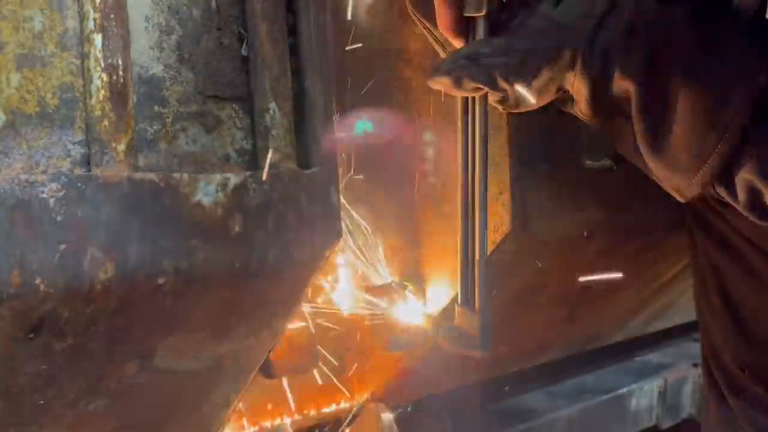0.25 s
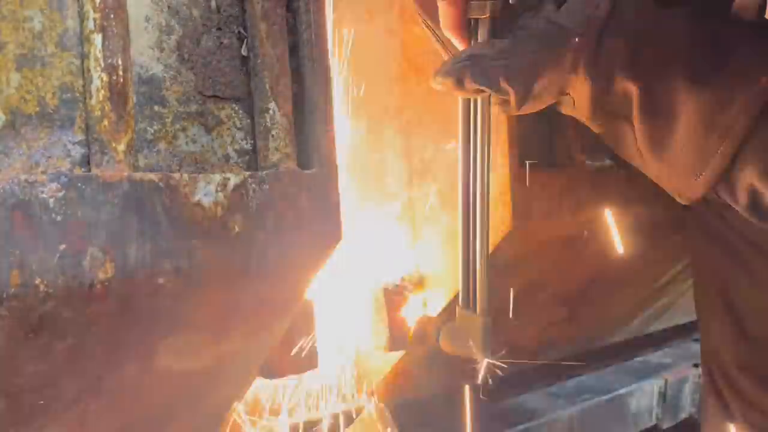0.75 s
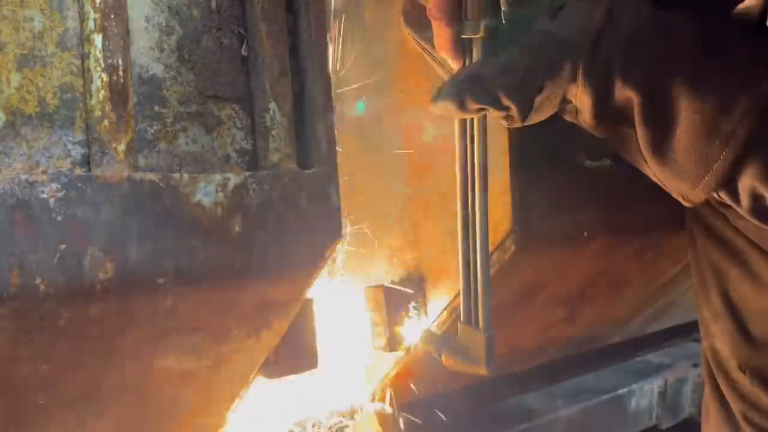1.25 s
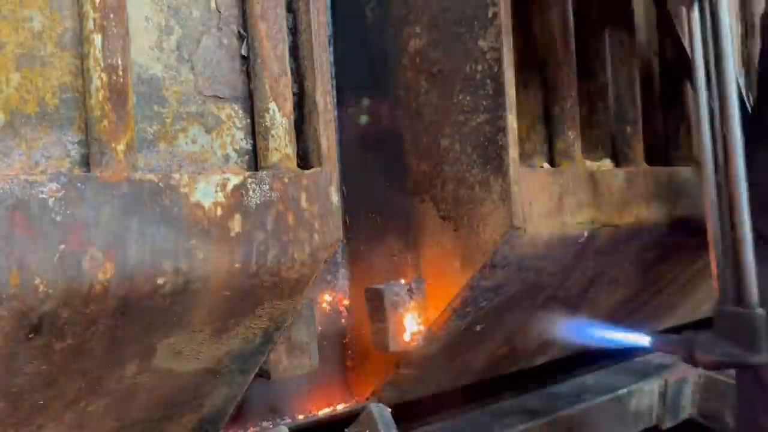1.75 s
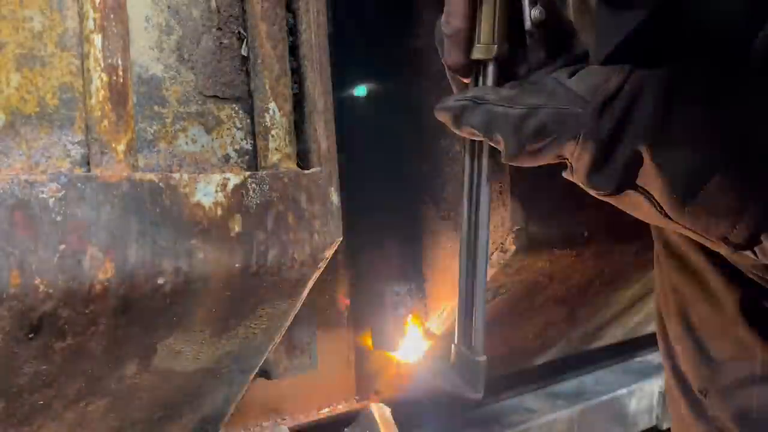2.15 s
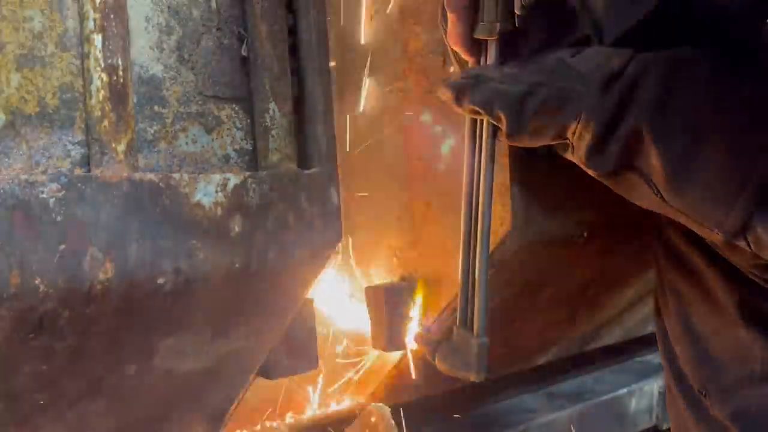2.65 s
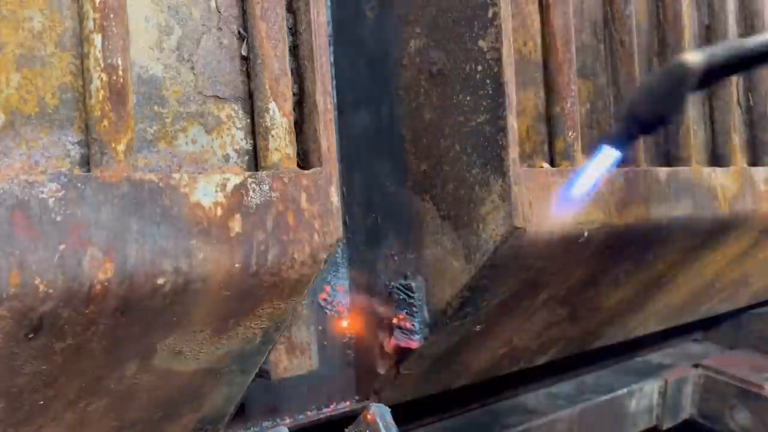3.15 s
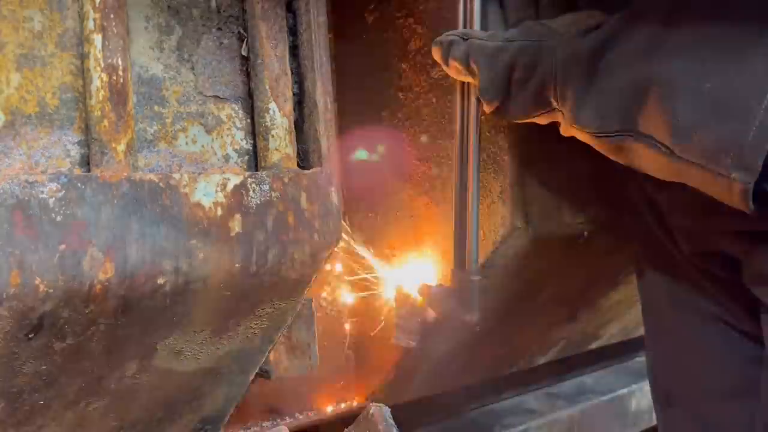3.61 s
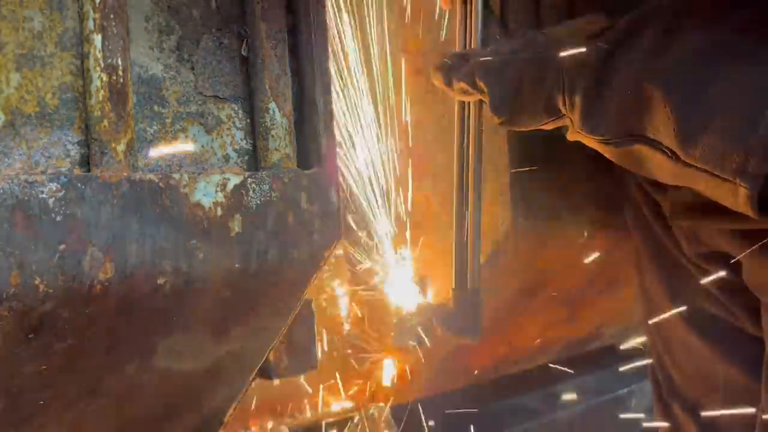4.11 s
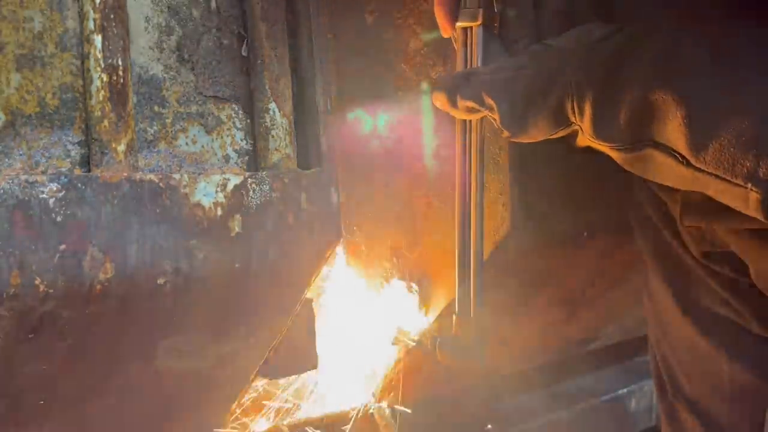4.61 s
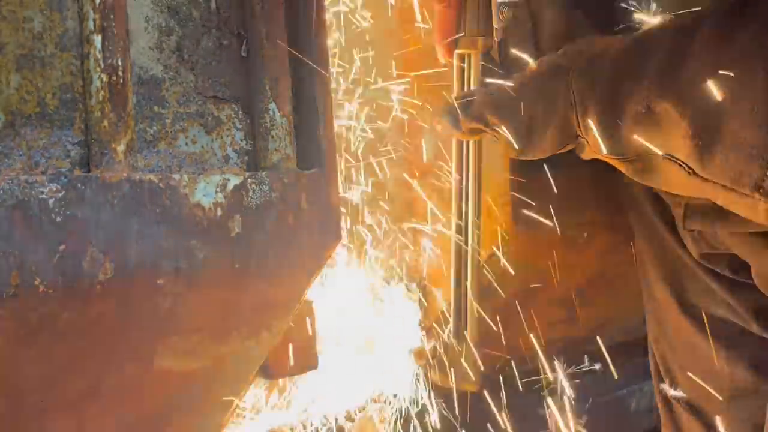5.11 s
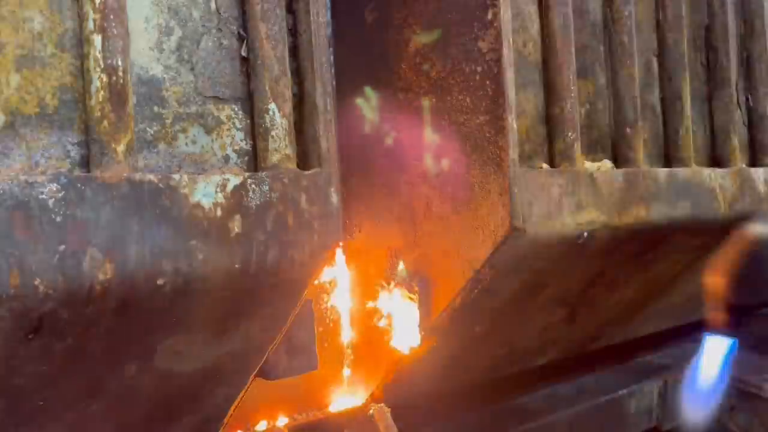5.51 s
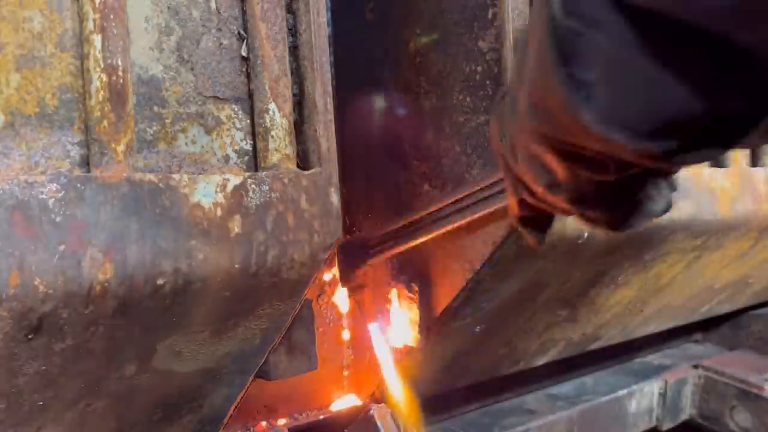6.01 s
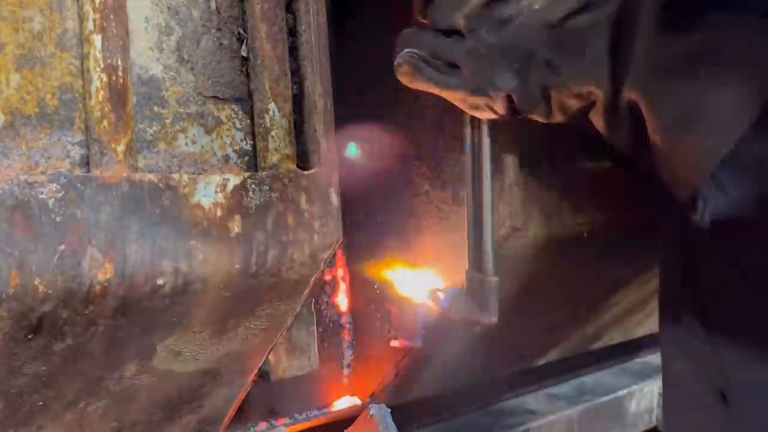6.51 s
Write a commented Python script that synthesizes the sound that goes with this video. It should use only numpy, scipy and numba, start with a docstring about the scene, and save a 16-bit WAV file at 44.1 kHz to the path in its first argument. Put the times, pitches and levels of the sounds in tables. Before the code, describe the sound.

Steady gas jet noise in a workshop, heard close and fairly dry: airy treble hiss, resonant roar and fluttering bass. Slag spits in short soft bursts, and loud backfires crack with a brief steely ring early and past the middle. A thin unsteady whistle comes and goes as cutting starts. Three times the flame moves clear and the hiss turns wider and phasey, longest near the end, with tiny crisp ticks.

```python
"""Gas torch cutting steel in a narrow gap

A torch works close by between rusty steel parts. Filtered noise makes its bass sputter, its roar between
the plates and the hiss of its jet; a jittering tone whistles, slag spits as short noise swells,
and backfires are falling chirps that ring two steel modes. When the torch swings clear of the gap, an echo
combs the hiss, its bright band sweeps, and roar and hiss widen."""
import sys
import numpy as np
from scipy import signal
from scipy.fft import rfft, irfft, next_fast_len
from scipy.io import wavfile
from scipy.ndimage import uniform_filter1d, map_coordinates
from numba import njit

SR = 44100
rng = np.random.default_rng(int(sys.argv[2]) if len(sys.argv) > 2 else 0)


def store_wav(level_fs):
    """Save 16-bit WAV to argv[1]."""
    pcm = np.round(np.clip(np.atleast_2d(level_fs), -1, 1) * 32767)
    wavfile.write(sys.argv[1], SR, pcm.T.astype(np.int16))


def gain_from_db(level_db):
    """Turn a decibel level (scalar or array-like) into a linear amplitude factor."""
    decades = np.asarray(level_db, float) / 20
    return 10 ** decades


N = 298113
HZ = np.fft.rfftfreq(next_fast_len(N), 1 / SR)
T = np.arange(N) / SR
LOW_CUT = signal.butter(4, 420, "highpass", fs=SR, output="sos")
GAP_CM, GAP_LIFT_DB = 5.7, 7.5  # echo path and lift of the bright band inside the gap


def shape(table, hz):
    """Spectral shaping: gain interpolated in dB along a log-frequency axis."""
    f, db = np.transpose(table)
    return gain_from_db(np.interp(np.log(hz + 1), np.log(f), db))


def unit(x):
    """Power normalization: scale to rms 1."""
    return x / np.sqrt(np.mean(x ** 2))


def walk(rate):
    """Slow random modulation: levels drawn every 1 / rate s, joined by slopes; spread near 1."""
    k = int(SR / rate)
    held = np.repeat(rng.standard_normal(N // k + 1), k)
    return uniform_filter1d(held, k)[:N]


@njit
def svf(x, hz, width):
    """Resonance: a state-variable band-pass with a moving centre, gain 1 at the centre."""
    y, b, l = np.empty(len(x)), 0., 0.
    for i in range(len(x)):
        g, k = np.tan(np.pi * hz[i] / SR), width[i] / hz[i]
        v = (b + g * (x[i] - l)) / (1 + g * (g + k))
        b, l, y[i] = 2 * v - b, l + 2 * g * v, k * v
    return y


def joined(tables, rest):
    """Piecewise-linear control: columns of several spans over the whole time, at rest between them."""
    out = np.outer(rest, np.ones(N))
    for table in tables:
        s, *columns = np.transpose(table)
        on = (T >= s[0]) & (T < s[-1])
        out[:, on] = [np.interp(T[on], s, c) for c in columns]
    return out


# The torch swung clear of the gap, one list of rows per swing. Each row: time in seconds,
# extra path of the echo in cm, lift of the bright band in dB.
SWINGS = [
    [(1.66, 5.7, 4), (1.7, 7, 4), (1.8, 7.6, 4), (1.86, 7, 7), (1.92, 5.7, 6)],
    [(2.78, 6.5, 2), (2.82, 9.3, 1), (2.9, 10, 1), (3.0, 9, 1), (3.04, 10, 9), (3.15, 9.8, 10),
     (3.21, 8.6, 9), (3.3, 5.7, 6)],
    [(5.38, 6.2, 2), (5.43, 8.6, 0), (5.54, 11, 0), (5.6, 9.2, 0), (5.66, 7, 2), (5.75, 7.6, -2),
     (6.0, 7.7, -2), (6.15, 7.4, -3), (6.3, 7.7, -3), (6.35, 7.4, 3), (6.41, 7.2, 6), (6.49, 5.7, 6)],
]


def swing():
    """Source motion: echo path (cm), being clear of the gap (0-1) and the bright band's lift (dB)."""
    path_cm, lift_db = joined(SWINGS, rest=(GAP_CM, GAP_LIFT_DB))
    clear = uniform_filter1d(1. * (path_cm > GAP_CM), size=int(.05 * SR))  # eased over 50 ms
    return path_cm, clear, lift_db


# Course of the flame. Each row: time in seconds, then levels in dB before each layer's own trim:
# roar between the plates, free jet hiss, slag sputter.
TORCH_LEVELS = [(0.0, -36.5, -33.5, -42), (0.09, -36.5, -36.5, -45.5), (0.21, -39.5, -37.5, -52),
                (0.3, -43, -40, -55), (0.6, -42.5, -40, -54.5), (0.92, -39.5, -38, -50.5),
                (1.56, -41, -38.5, -51.5), (1.9, -39, -35.5, -52.5), (2.18, -37, -33.5, -52),
                (2.39, -38, -35, -48), (2.54, -38.5, -37.5, -49.5), (2.82, -41.5, -37.5, -56),
                (3.09, -43.5, -38, -56), (3.24, -36.5, -35.5, -52), (3.41, -35, -34.5, -52.5),
                (3.54, -35, -33.5, -53.5), (3.75, -37, -33.5, -54), (4.05, -39, -37, -48.5),
                (4.39, -39.5, -38.5, -53), (4.86, -40.5, -37.5, -51), (4.95, -38, -35, -48.5),
                (5.14, -36.5, -33.5, -50), (5.48, -40.5, -35, -55.5), (5.74, -40, -34.5, -54),
                (5.99, -35.5, -32, -50), (6.29, -38.5, -31.5, -52.5), (6.44, -37, -35.5, -51),
                (6.76, -34.5, -33.5, -53)]


def torch_levels():
    """Level interpolation: roar, hiss and sputter (dB) follow the torch's course in straight lines."""
    s, *columns = np.transpose(TORCH_LEVELS)
    return [np.interp(T, s, c) for c in columns]


# The flame falters (-) or flares (+). Each row: centre in seconds, change in dB at the centre,
# half length to 1/e of the change in seconds.
FLAME_FLUTTERS = [(0.11, 4.5, .01), (0.136, -0.5, .015), (0.184, 5, 0.017), (0.213, 0, 0.0087),
                  (0.497, 3, 0.0093), (0.764, 4, 0.038), (1.119, 3.5, 0.011), (1.66, -3.5, 0.01),
                  (1.912, -9, .01), (1.962, -7, 0.013), (2.006, 6.5, 0.043), (2.079, -2.5, 0.018),
                  (2.228, 3.5, 0.018), (2.59, -0.5, 0.022), (2.672, -4.5, .015), (2.741, 5, 0.0081),
                  (2.792, -3.5, 0.0075), (3.323, -5, 0.011), (3.447, -5, 0.022), (3.543, -3, 0.023),
                  (3.657, 3, 0.083), (3.917, -3, 0.073), (4.206, 3, 0.0049), (4.725, 3, 0.012),
                  (4.803, -1, 0.027), (5.104, -1.5, 0.016), (4.624, -8, 0.0072), (4.992, 2.5, 0.032),
                  (5.367, -12, 0.006), (5.395, 1.5, .015), (5.85, 2, .012), (6.1, -2, 0.0098),
                  (6.23, 0.5, .06), (6.44, 4, 0.04), (6.495, -3.5, 0.026), (6.59, 4, 0.013)]


def flutter():
    """Amplitude modulation: Gaussian dips and flares of the flame, summed in dB."""
    flutter_db = np.zeros(N)
    for at, db, half in FLAME_FLUTTERS:
        near = slice(max(int((at - 2 * half) * SR), 0), int((at + 2 * half) * SR))
        flutter_db[near] += db * np.exp(-((T[near] - at) / half) ** 2)
    return flutter_db


# Preheating, the cutting oxygen shut. Each row: start in seconds, end in seconds;
# a row that ends before it starts has no effect.
PREHEAT_SPANS = [(.32, 0.75), (1.92, 2.25), (3.3, 3.2), (6.49, 6.2)]


def preheating():
    """Gating: 1 while preheating, else 0, with smoothed edges."""
    gate = sum(1. * (T > on) * (T < off) for on, off in PREHEAT_SPANS)
    return uniform_filter1d(gate, size=400)


# Stereo width of the noise inside the gap. Each row: frequency in Hz, side minus mid in dB.
STEREO_WIDTH = [(60, -5), (110, -6), (200, -26), (380, -22), (700, -24), (1290, -27), (2380, -18.5),
                (4400, -10.5), (8120, -12), (15000, -7)]


def turbulence(table, edges_hz, shared_db, own_db, rate):
    """Turbulent noise: partly coherent left and right, in bands that flicker together and alone."""
    path_cm = swing()[0]
    widen = gain_from_db(path_cm - GAP_CM)  # 1 dB per cm beyond the gap's path
    mid, side = rfft(rng.standard_normal((2, 2 * len(HZ) - 2))) * shape(table, HZ)
    side = side * shape(STEREO_WIDTH, HZ)
    shared, bands = shared_db * walk(rate), []
    for lo, hi in zip(edges_hz, edges_hz[1:]):
        in_band = (HZ >= lo) & (HZ < hi)
        m, s = irfft(np.array([mid, side]) * in_band)[:, :N]
        s = s * widen if lo > 1200 else s
        bands.append(np.array([m + s, m - s]) * gain_from_db(shared + own_db * walk(rate)))
    return bands


# Colour of the sputter. Each row: frequency in Hz, relative density in dB per Hz.
SPUTTER_COLOUR = [(35, -76), (60, -55), (114, -44.5), (224, -36), (394, -11), (637, -1), (1150, -1),
                  (1470, -3), (1600, -14), (2080, -12), (3520, -120)]


def sputter():
    """Modulated low-frequency noise: slag flutters in the bass of the flame."""
    sputter_db = torch_levels()[2]
    noise = sum(turbulence(SPUTTER_COLOUR, (20, 600, 1000, 1700), shared_db=3.0, own_db=-1.0, rate=60))
    return unit(noise) * gain_from_db(sputter_db + 3.5 + .37 * flutter())  # share of the flutter


# Slag blown out, low bursts first, then spits in the treble. Each row: start in seconds,
# level in dB before the 9.5 dB trim, centre in Hz, length in seconds.
SLAG_BURSTS = [(0.091, -24.5, 615, 0.021), (0.192, -17, 2100, 0.008), (0.825, -21, 2340, 0.0089),
               (0.868, -25.5, 1360, 0.01), (0.959, -33, 1500, 0.013), (0.989, -26.5, 3880, 0.014),
               (1.052, -28, 1430, 0.011), (1.096, -24.5, 646, 0.03), (1.156, -23.5, 1400, 0.014),
               (1.328, -21.5, 1520, 0.0081), (1.412, -30, 1500, 0.0093), (1.688, -28, 3870, 0.018),
               (2.284, -21, 2550, 0.015), (2.368, -18, 920, 0.015), (2.43, -24.5, 2510, 0.014),
               (2.503, -23.5, 720, 0.015), (2.631, -16, 2390, 0.0053), (2.723, -26.5, 2240, 0.051),
               (3.306, -24.5, 2180, 0.011), (4.047, -6.5, 2477, 0.0053), (4.208, -17.5, 2220, 0.0056),
               (4.743, -21.5, 2230, 0.0097), (4.852, -31, 2000, 0.01), (4.932, -24, 3620, 0.015),
               (4.993, -21, 580, 0.0081), (5.099, -22.5, 1820, 0.011), (5.275, -20.5, 1830, 0.032),
               (6.569, -22.5, 2260, 0.015), (1.617, -21, 13700, 0.011), (2.735, -27, 13300, 0.0053),
               (2.767, -42, 13170, 0.02), (3.3594, -18, 6370, 0.0079), (5.864, -25, 14100, 0.01),
               (5.926, -19.5, 6410, 0.01), (5.98, -15, 12300, 0.01), (6.0374, -9, 13300, 0.0056),
               (6.2554, -11, 12900, 0.0069)]


def slag():
    """Transient band noise: each burst swells quickly and dies as a Gaussian; no bass."""
    out, size, spread = np.zeros(N + SR), 4096, .61  # spread: bandwidth over centre
    for s, db, hz, length in SLAG_BURSTS:
        t = np.arange(size) / SR / length
        noise = rng.standard_normal(size)
        body = unit(svf(noise, np.full(size, 1. * hz), np.full(size, spread * hz)))
        start = int(s * SR)
        out[start:start + size] += gain_from_db(db - 9.5) * body * np.minimum(3 * t, 1) * np.exp(-t ** 2)
    return signal.sosfilt(LOW_CUT, out[:N])


# Backfires. Each row: time in seconds, chirp peak in dB before the stereo blend, ring over chirp in dB,
# treble tilt in dB per octave (reached well above 2 kHz), polarity of the chirp, +1 or -1.
BACKFIRES = [(.23161, -6, -12, 3, 1), (.23253, -6.5, 2, 1, 1), (.23599, -5, -12, 0, 1),
             (3.95326, -5.5, 2, 0, 1), (4.01615, -7, -3, 0, 1), (4.64016, -6, -1, 2, -1),
             (4.64195, -3.5, -12, 0, 1), (4.64374, -6, -12, 0, -1)]
# Spectrum of a backfire. Each row: frequency in Hz, relative density in dB per Hz.
BACKFIRE_COLOUR = [(30, -16), (170, -17), (300, -14), (450, 1), (650, .5), (1000, 2.5), (1500, -.5),
                   (2500, -11), (4000, -9.5), (6000, -18.5), (8000, -19.5), (13000, -44.5)]
# Modes of the steel. Each row: frequency in Hz, relative level in dB, 60 dB decay time in seconds.
STEEL_MODES = [(430, -16, .1), (501, -15.5, .11)]


def backfires():
    """Dispersion and modal ringing: treble arrives first, then two close steel modes beat."""
    size, lead = 8192, 64
    lag_s, bend, turn = .001343, .7477, .027  # delay at 1 kHz, its power of frequency, phase in cycles
    hz, t = np.fft.rfftfreq(size, 1 / SR), np.arange(size) / SR
    # delay falls as a power of frequency; the phase is its integral
    cycles = lag_s * 1000 ** bend * hz ** (1 - bend) / (1 - bend) - turn + hz * lead / SR
    phase = -2 * np.pi * cycles
    ring = sum(gain_from_db(db - 60 * t / t60) * np.sin(2 * np.pi * f * t) for f, db, t60 in STEEL_MODES)
    ring = np.roll(ring * np.minimum(t / .003, 1), lead)
    out = np.zeros(N + size)
    for s, db, ring_db, treble_db, polarity in BACKFIRES:
        tilt = gain_from_db(treble_db * np.log2(1 + hz / 2000))
        at = s * SR - int(s * SR)  # fraction of a sample
        spectrum = shape(BACKFIRE_COLOUR, hz) * tilt
        chirp = irfft(spectrum * np.exp(1j * (phase - 2 * np.pi * hz * at / SR)))
        chirp = chirp * np.exp(-(t / .014) ** 2)
        chirp = polarity * chirp / np.abs(chirp).max()
        start = int(s * SR) - lead
        out[start:start + size] += gain_from_db(db) * (chirp + gain_from_db(ring_db) * ring)
    # the right channel blends in a copy half a millisecond late
    return np.array([out[:N], .86 * out[:N] + .14 * np.roll(out[:N], 22)])


# The whistle catches as the oxygen bites, then climbs, thins and fades. Each row: start in seconds,
# starting level in dB, length in seconds.
WHISTLE_CATCHES = [(0.486, -37.5, 0.038), (0.736, -38.5, .205), (2.204, -35, 0.074), (2.274, -37.5, 0.12),
                   (3.576, -34.5, 0.32), (6.722, -36.5, 0.46)]
# Steady whistling of the torch, near 1500 or 1900 Hz. Each row: start in seconds, length in seconds,
# starting pitch in Hz, level in dB after the swell, width in Hz.
WHISTLE_NOTES = [(0.451, .285, 1872, -48.5, 80), (0.939, 0.26, 1486, -49, 80), (1.24, .3, 1494, -47.5, 50),
                 (1.57, 0.097, 1467, -49, 40), (1.701, .5, 1900, -49, 90), (2.582, 0.21, 1479, -53, 55),
                 (3.201, .375, 1921, -41.5, 132.5), (6.4, 0.48, 1948, -43, 110)]


def whistling():
    """Frequency and amplitude contours: pitch, level, octave level and width of the whistle."""
    u = np.linspace(0, 1, num=9)
    catches = []
    for s, db, length in WHISTLE_CATCHES:
        hz = 1235 + 211.5 * u ** 2.5
        catches.append(np.transpose([s + length * u, hz, db - 13.5 * u ** 1.25, db - 22 * u, 167.8 - 60 * u]))
    notes = []
    for s, length, hz, db, width in WHISTLE_NOTES:
        # pitch creeps up 60 Hz per s, level swells by 1.5 dB in the first third
        notes.append([(s + t, hz + 60 * t, db - 1.5 * (t == 0), db - 24, width)
                      for t in (0, length / 3, length)])
    return joined(notes + catches, rest=(1500, -90, -90, 100))


def whistle():
    """Self-sustained oscillation: a tone whose pitch jitters within its width, with a rougher octave."""
    hz, first_db, octave_db, width = whistling()
    jittered_hz = hz + 18 * walk(15) + .75 * width * walk(600)  # slow waver, then fast jitter
    phase = 2 * np.pi * np.cumsum(jittered_hz) / SR
    first = np.sin(phase) * gain_from_db(3 * walk(60)) * uniform_filter1d(gain_from_db(first_db), size=300)
    rough = svf(rng.standard_normal(N), 2 * hz, 3.0 * width)
    rough = svf(rough, 2 * hz, 3.0 * width)
    octave = rough / np.sqrt(width / SR) * uniform_filter1d(gain_from_db(octave_db), size=300)
    return signal.sosfilt(LOW_CUT, np.sqrt(2) * first + .5 * octave)


# Colour of the roar. Each row: frequency in Hz, relative density in dB per Hz.
ROAR_COLOUR = [(880, -19), (1500, -14), (1580, -3), (1730, -3.5), (1940, -1.5), (2140, -1), (2310, 0),
               (3030, -5.5), (3460, -6.5), (3940, 0.5), (4160, 0), (4790, -5.5), (5300, -9.5), (6890, -38),
               (11700, -120)]
# Low, middle and top of the roar. Each row: trim in dB, change clear of the gap in dB,
# change while preheating in dB.
ROAR_TRIMS = [(0.5, -0.5, 0), (0.5, 4, 0.5), (0.5, -2, 0.5)]


def roar():
    """Resonant coloration: turbulent noise coloured by the plates, band by band."""
    roar_db = torch_levels()[0]
    clear, preheat = swing()[1], preheating()
    bands = turbulence(ROAR_COLOUR, (1400, 2970, 3920, 5220), shared_db=1.0, own_db=0.67, rate=70)
    bands = unit(np.array(bands))
    mix = sum(band * gain_from_db(db + clear_db * clear + preheat_db * preheat)
              for band, (db, clear_db, preheat_db) in zip(bands, ROAR_TRIMS))
    return mix * gain_from_db(roar_db - 4.5 + .54 * flutter())  # share of the flutter


def swept(x, tremble):
    """Comb filtering: an echo off the plate delays with the path; the jet's brightest band sweeps."""
    path_cm, clear, lift_db = swing()
    path_cm = path_cm + .35 * clear * tremble
    bright_hz = 13995 * (GAP_CM / path_cm) ** 1.8  # falls as the path grows
    # the rusty, uneven plate returns only part of it, in patches
    echo = .68 * clear * np.clip(.7 + .35 * walk(40), 0, 1)
    late = map_coordinates(x, [np.arange(N) - SR * path_cm / 34300], order=3)  # sound speed in cm/s
    x = (x + echo * late) / np.sqrt(1 + echo ** 2)
    return x + (gain_from_db(lift_db) - 1) * svf(x, bright_hz, .28 * bright_hz)


# Colour of the hiss. Each row: frequency in Hz, relative density in dB per Hz.
HISS_COLOUR = [(3060, -41), (5200, -11.5), (5480, -5), (5930, 0.5), (6640, -3.5), (7360, -1), (8090, -1),
               (8810, 0), (10200, -1), (11700, -1), (14800, -3.5), (15500, 3.5), (16000, -51)]
# Low, middle and top of the hiss. Each row: trim in dB, gain in dB per dB of hiss over roar,
# change clear of the gap in dB, change while preheating in dB.
HISS_TRIMS = [(-5, 0.01, 0, -1), (-9.5, 0.57, 3, -4), (-5.5, 0.24, 3.5, -2)]


def hiss():
    """Jet noise: broadband turbulence of the free jet, combed by the plate's echo."""
    roar_db, jet_db, _ = torch_levels()
    clear, preheat, flutter_db = swing()[1], preheating(), flutter()
    bands = turbulence(HISS_COLOUR, (4370, 7800, 10900, 16700), shared_db=1.25, own_db=0.58, rate=70)
    jet = 0
    for band, (db, tilt, clear_db, preheat_db) in zip(bands, HISS_TRIMS):
        level_db = jet_db + db + tilt * (jet_db - roar_db) + clear_db * clear + preheat_db * preheat
        jet = jet + unit(band) * gain_from_db(level_db + flutter_db)
    tremble = walk(20)
    return np.array([swept(side, tremble) for side in jet]) * gain_from_db([[.4], [-.4]])  # slightly left


def scene():
    """Superposition: all layers add; whistle and slag come from straight ahead."""
    return sputter() + slag() + backfires() + whistle() + roar() + hiss()


def roll_off(x):
    """The treble ends steeply here."""
    return signal.sosfilt(signal.butter(12, 17080, fs=SR, output="sos"), x)


def record(dry):
    """Signal chain: the finished mix goes through one last stage, with no other filtering."""
    return roll_off(dry)


dry = scene()
out = record(dry)
store_wav(out)
```